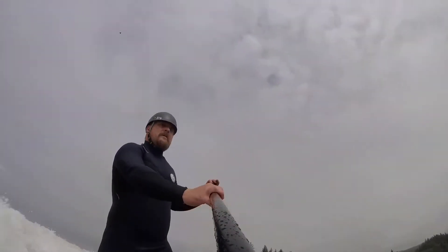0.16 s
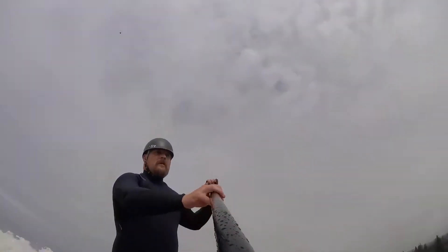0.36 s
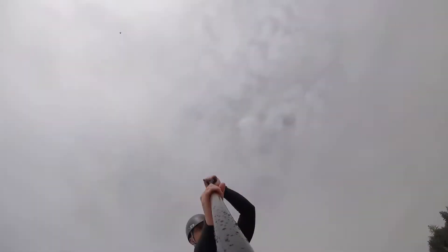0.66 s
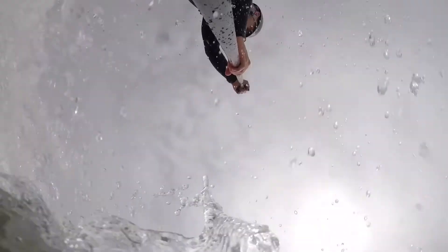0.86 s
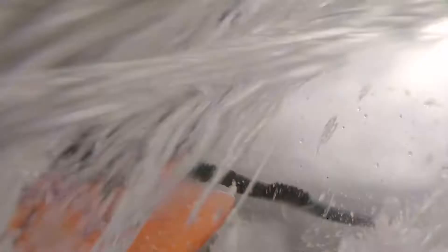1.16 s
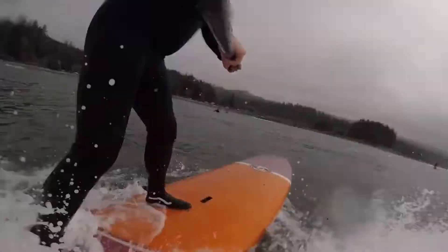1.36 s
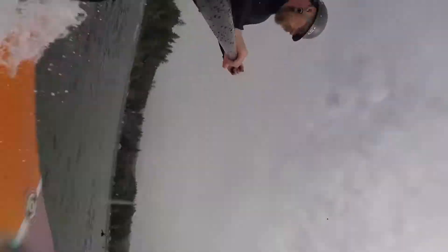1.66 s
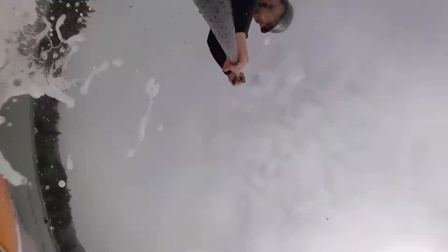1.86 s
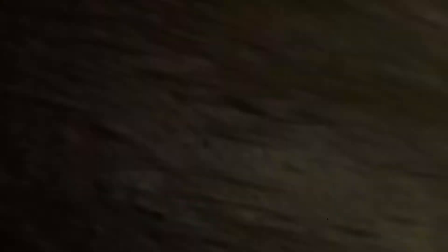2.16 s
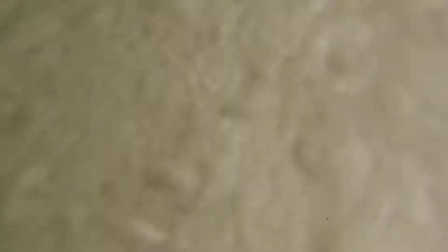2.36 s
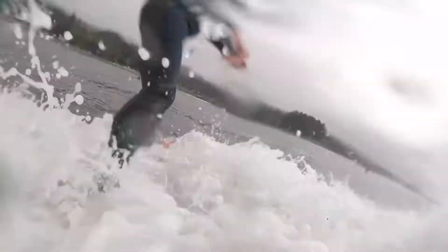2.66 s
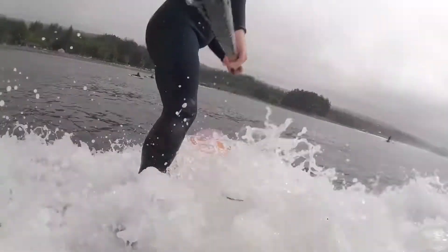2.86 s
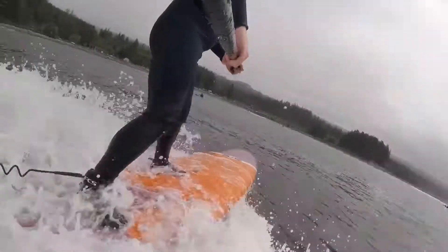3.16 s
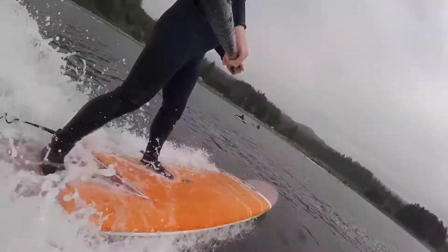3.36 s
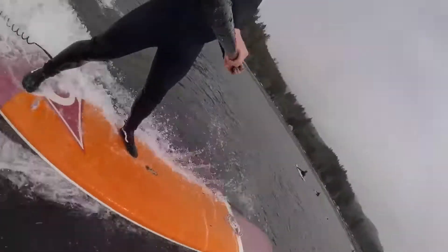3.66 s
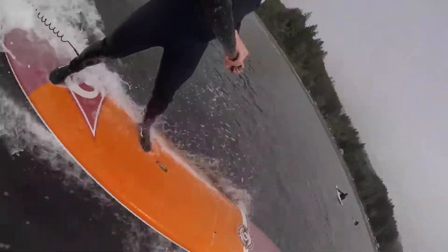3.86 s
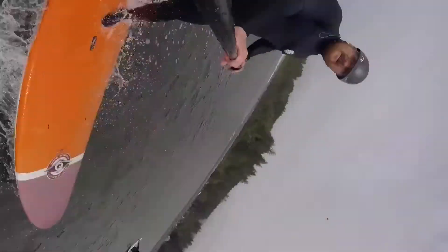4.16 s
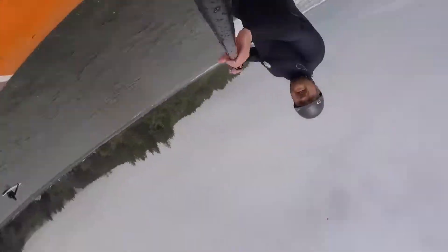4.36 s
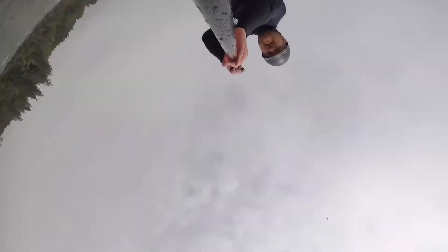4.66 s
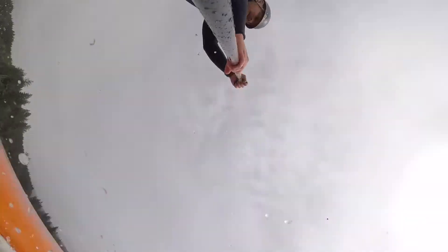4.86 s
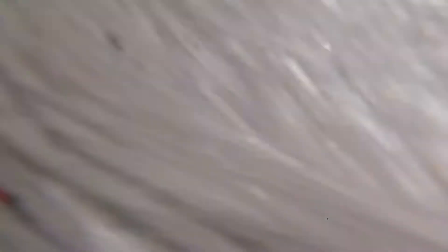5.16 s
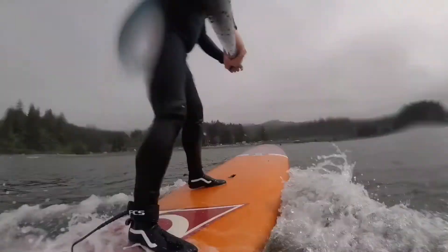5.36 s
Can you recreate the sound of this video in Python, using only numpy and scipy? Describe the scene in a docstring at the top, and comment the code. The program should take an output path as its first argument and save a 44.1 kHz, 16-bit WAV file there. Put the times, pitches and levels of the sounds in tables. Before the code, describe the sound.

Outdoors on a small breaking wave, a housed action-camera microphone is buffeted by air, hollow flutters and a thin airy whistle. It plunges under with sharp slaps and bubbly churning, emerges to near silence, gusts and plunges again, stays quiet, then hisses past a board in foam and strong wind before a last brighter, splashy dip and a quick fade.

```python
"""In breaking surf, a camera on a paddle swings through the wind, dips in three times and skims past a surfboard.
Filtered noise makes the air buffeting the microphone and the white water hissing around the board.
Wavering sine tones make fluttering vortices and one low thump; narrow noise of moving pitch whistles and chirps.
In each dip, short noise bursts slap the housing, and swarms of tiny rings churn and crackle as bubbles and spray.
Big bubbles glug as gliding sine tones, and thrown drops tick as small bursts."""
import sys
import numpy as np
from scipy import signal
from scipy.fft import rfft, irfft, next_fast_len
from scipy.io import wavfile
from scipy.ndimage import uniform_filter1d, minimum_filter1d, map_coordinates

SR = 44100
rng = np.random.default_rng(int(sys.argv[2]) if len(sys.argv) > 2 else 0)


def log_audio(samples):
    """Write samples as a 16-bit WAV file to the path given in sys.argv[1]."""
    # one column per channel
    frames = np.atleast_2d(samples).T
    # limit to full scale, then quantise
    limited = np.clip(frames, -1, 1)
    pcm = np.round(limited * 32767).astype(np.int16)
    wavfile.write(sys.argv[1], SR, pcm)


N = 243395  # length in samples

# In all tables, t60/s is the time a sound takes to fade by 60 dB.
# airflow on the microphone: (t/s, buffet level/dB, eddy level/dB)
WIND = [(0, -15, -22), (.15, -24.5, -22), (.42, -8, -18), (.6, -17, -18), (1.13, -20.5, -21),
        (1.46, -42.5, -55.5), (1.69, -43, -52), (2.05, -16.5, -23), (2.44, -19.5, -25.5),
        (2.63, -37.5, -50.5), (2.87, -52, -56), (3.09, -48.5, -51), (3.58, -23, -42.5), (4.0, -17.5, -26.5),
        (4.62, -19, -34), (5.08, -19.5, -26), (5.41, -40, -54.5), (5.52, -45, -60)]
# gusts, each a quick swell of the airflow: (centre t/s, length/s, buffet level/dB, eddy level/dB)
GUSTS = [(0.512, .08, -8, -24), (0.674, 0.089, -7.5, -15), (.807, 0.018, -6, -8.5),
         (1.783, 0.074, -19, -32.5), (1.93, .06, -10, -19.5), (2.068, 0.039, -3.5, -12),
         (3.538, 0.053, -13, -36.5), (3.705, 0.085, -11, -31.5), (3.773, 0.061, -19.5, -39),
         (3.983, 0.088, -9.5, -16), (4.056, 0.082, -6.5, -16), (4.739, 0.12, -9, -17.5),
         (4.839, 0.048, -9.5, -12), (4.933, 0.037, -11.5, -26), (5.056, 0.1, -18, -14.5)]
# air puffing into the microphone port: (t/s, peak level/dB, t60/s of its noisy tail)
PUFFS = [(.359, -18, 0.02), (.587, -15, 0.03), (0.674, -6, 0.024), (.707, -14.5, 0.027), (4.051, -6, 0.011),
         (4.229, -8.5, 0.089), (4.346, -21, 0.073), (4.41, -12.5, 0.067)]
# the breaking wave in open air: (t/s, roar level/dB, foam hiss level/dB, fine fizz level/dB)
SURF = [(0, -25.5, -30.5, -47.5), (.22, -24.5, -32, -51.5), (.37, -25, -33.5, -46), (.64, -29, -37, -49),
        (.8, -31, -36.5, -47), (1.36, -55, -61, -91.5), (1.48, -62.5, -64, -75), (1.68, -61, -61.5, -74),
        (1.8, -52.5, -54, -63), (2.76, -56.5, -62.5, -69.5), (3.02, -52.5, -58, -64.5),
        (3.29, -51, -47.5, -59), (3.75, -44, -36, -53), (3.98, -41.5, -37.5, -57), (4.2, -34, -36.5, -63),
        (4.62, -36, -44.5, -62.5), (5.28, -50.5, -58.5, -70.5), (5.39, -53.5, -51.5, -60)]
# water lying over the microphone port: (t/s, cover 0-1)
COVER = [(.9, 0.02), (.925, 0.8), (1.15, 0.16), (1.4, 0.37), (2.1, 0), (2.16, 0.7), (2.5, 1), (2.9, 0.11)]
# trains of shed vortices, and one low thump of the housing at 3.13 s: (t/s, length/s,
# start f/Hz before scatter, level/dB, overtone level/dB beside the base tone, pitch scatter 0-1)
FLUTTERS = [(0.038, 0.051, 159.4, -9.5, -14.5, 0.19), (0.08, 0.098, 204.7, -7, -17.5, 0),
            (.185, 0.065, 113.6, -9, -11.5, 0.17), (0.355, 0.018, 291, -10, -11, 0),
            (0.426, 0.065, 329.8, -9.5, -21.5, 0.08), (0.58, 0.034, 267, -17.5, 5, 0.02),
            (.675, 0.02, 330, -8.5, -34, 0.2), (3.128, 0.041, 140.4, -26, -19, 0.14),
            (3.885, 0.028, 173, -17, -13, 0.24), (3.974, 0.054, 159.2, -10.5, -10, 0.25),
            (4.054, 0.015, 267, -13.5, -16, .23), (4.229, 0.031, 211.3, -14.5, -13.5, 0.09),
            (4.236, 0.082, 161.5, -11, -24.5, 0.12), (4.352, 0.035, 109.5, -9.5, -18.5, 0.15),
            (4.411, 0.12, 313.2, -15, -18, 0.1), (4.419, 0.069, 185, -8, -13, 0.23),
            (4.489, 0.073, 142.7, -7.5, -17, 0.14)]
# air whistling past an edge: (t/s, f/Hz, level/dB)
WHISTLE = [(.24, 5500, -59), (.31, 5600, -44), (.45, 6050, -40), (.51, 6950, -37), (.59, 7200, -33.5),
           (.668, 8500, -37), (0.698, 7700, -62.5), (0.748, 8700, -39.5), (0.811, 7700, -35.5)]
# short chirps, two airy tones before the first dip, then squirts of water and air:
# (t/s, length/s, start f/Hz, end f/Hz, level/dB at mid-chirp)
CHIRPS = [(0.361, 0.012, 1165, 1122, -18), (0.429, .028, 792, 852, -19.5),
          (0.834, 0.014, 1126, 1000, -16.5), (0.854, 0.02, 7230, 6670, -30),
          (0.867, 0.059, 1523, 1002, -19.5), (1.103, 0.047, 1530, 1424, -23.5),
          (1.935, 0.0078, 1408, 1364, -25.5), (1.966, 0.02, 4700, 6100, -43),
          (1.984, 0.052, 2680, 2920, -40), (2.043, 0.037, 3880, 3240, -44.5),
          (2.088, 0.018, 2860, 3010, -33), (2.387, 0.037, 1702, 1480, -27), (4.718, 0.045, 2460, 2070, -25)]
# dips into the water: (from t/s, to t/s, typical bubble f/Hz, treble lift/dB)
DIPS = [(.79, 1.452, 1206, 3), (1.909, 2.66, 1452, 3), (4.682, 5.32, 1530, 10)]
# surges of water over the housing: (t/s, hold/s, churn t60/s, churn level/dB, spray level/dB)
SURGES = [(0.799, 0.037, 0.39, -21.5, -37), (0.863, .032, 0.099, -14.5, -32),
          (1.032, 0.021, 0.23, -23, -78), (1.07, 0.047, .3, -20.5, -59.5), (1.197, 0.05, 0.32, -36, -77),
          (1.924, 0.05, 0.14, -28, -44), (1.98, 0.16, .2, -29.5, -53.5), (2.098, 0.013, 0.079, -14, -34.5),
          (2.16, 0.094, .2, -30.5, -63), (2.234, 0.022, 0.33, -23.5, -58.5), (2.288, 0.1, 0.39, -27, -69.5),
          (4.703, 0.059, 0.42, -23.5, -56.5), (4.831, .003, 0.15, -19, -42.5),
          (4.863, 0.052, .15, -18.5, -52.5), (4.925, 0.019, 0.17, -12.5, -44),
          (5.005, 0.022, 0.17, -16, -53), (5.058, 0.023, 0.28, -25, -56), (5.149, .015, 0.25, -29.5, -61)]
# water slapping the housing: (t/s, smack peak level/dB, crack and push levels/dB beside the smack)
SLAPS = [(0.8, -3, -12, -4.5), (.837, -7, -14, -1), (.867, 0, 0, -0.5), (.887, -12.5, -20.5, 3),
         (.9, -7, -27.5, 4), (0.912, -5.5, -49.5, -3.5), (1.011, -13, -44, 7.5), (1.035, -1, -17.5, -13),
         (1.107, -2.5, -38.5, -25), (1.246, -29, -50, -10.5), (1.921, -14.5, -17.5, 3),
         (1.936, -9, -29.5, 2.5), (2.104, 0, -34, -16), (2.119, -0.5, -38, -2), (2.239, -10, -39, -1.5),
         (2.443, -26, -30, 8.5), (2.487, -17.5, -31, -20), (2.542, -29.5, -37, 13),
         (2.687, -25.5, -22.5, 16), (2.719, -35.5, -41, 17.5), (4.707, -28, -24, 22.5),
         (4.827, -1, -31.5, -9), (4.901, -12, -35, 8.5), (4.934, -6, -28.5, 3), (4.948, -1, -20.5, -10),
         (5.028, 2.5, -46, 5.5), (5.073, -6, -39, 7.5), (5.188, -20.5, -18.5, 10.5),
         (5.243, -28.5, -47, 11.5)]
# large bubbles glugging as the water drains: (t/s, base f/Hz, level/dB before fading)
GLUGS = [(.94, 414, -10), (1.02, 360, -6.5), (1.149, 380, -18), (1.24, 388, -22.5), (1.329, 360, -41),
         (2.14, 455, -18), (2.59, 383, -25.5)]
# single drops landing on the housing: (t/s, tap peak level/dB, tick level/dB beside the tap)
DROPS = [(3.1266, -41.5, 3.5), (3.243, -43.5, 3.5), (3.9828, -18.5, -23.5), (4.0203, -21, -39),
         (4.2458, -14.5, -38.5), (4.3022, -19, -27), (4.5509, -31.5, -2), (4.6218, -22, -30),
         (5.1975, -26.5, -39)]

# Colours, meaning how strong each pitch region is: (f/Hz, level/dB per Hz)
# slow, deep thumps of wind
BUFFET = [(8, -5.5), (25, 3), (55, 2.5), (100, 1), (150, -13.5), (250, -43), (600, -58.5), (1500, -120)]
# smaller, quicker swirls of wind
EDDIES = [(70, -19.5), (150, 4), (220, -1), (350, -6), (500, -16), (800, -23), (1600, -41.5), (4000, -99.5)]
# low body of the breaking wave
ROAR = [(200, -20.5), (450, -2), (700, -4), (1200, -7.5), (1700, -7.5), (2400, -17), (3500, -35.5),
        (6000, -68.5)]
# hiss of the foam, and the tap of a drop
FOAM = [(900, -36.5), (1700, -5.5), (2150, 2.5), (2700, -5), (3200, -9.5), (3800, -21.5), (4500, -43),
        (7000, -68), (12000, -84.5)]
# finest bubbles in the foam, and the tick of a drop
FIZZ = [(3000, 0), (4500, -6), (5500, -5.5), (6700, 0), (8000, -7.5), (9500, -14.5), (11500, -18.5),
        (15000, -31)]
# bubbly water over the housing, and the smack of a slap
CHURN = [(150, -18.5), (350, 6.5), (700, -1), (1000, -4.5), (1600, 0), (2200, -8), (3000, -14),
         (3900, -26.5), (6000, -62), (12000, -90)]
# bright spray, and the crack of a slap
SPRAY = [(2000, -24.5), (3500, -4.5), (5000, -6.5), (7000, 0.5), (9000, -4.5), (11000, -13), (15000, -33)]
# low push of pressure in a slap
PUSH = [(15, -26), (50, 2.5), (110, 4), (250, -7), (500, -23.5), (1200, -24), (4000, -99.5)]
# skirt of an edge tone: (distance from its pitch f/Hz, level/dB)
TONE_SKIRT = [(50, 11), (200, 0.5), (450, 1), (900, -17), (2000, -31), (5000, -78.5)]
# hollow puff in the microphone port
PUFF = [(80, -19.0), (300, -11.5), (600, 11.0), (850, 1.0), (1200, -15.5), (2500, -62.5)]
# hiss of a whistle that has broken up
WHISTLE_HISS = [(3000, -46.5), (4500, -11.5), (5600, 7), (7000, 5.5), (9000, -6.5), (10500, -22.0), (14000, -32)]
# overtones 2 to 5 of vortices and thump, beside one another: (level/dB)
FLUTTER_OVERTONES_DB = [8, 0.0, -8, -31.5]

LOCKED_BUFFET_DB, LOCKED_EDDY_DB = -3.5, -2.5  # turbulence eases during each vortex train and the thump
FLUTTER_SAG = .11  # share by which the pitch falls along a vortex train or the thump
FLUTTER_ATTACK_S, FLUTTER_RELEASE_S = .0075, .024
BREAKUP_HZ, BREAKUP_SPAN_HZ = 6740, 1900  # above this pitch the tone turns to hiss, fully so one span higher
BROKEN_AT_REST = .08  # share of hiss in the slowest whistle
OCTAVE_DB = -21  # overtone of the slowest whistle; it is gone at the breakup pitch
SURGE_ATTACK_S = .008
SPRAY_LIFE = 0.49  # spray dies in this share of the churn's time
SPLATTER_T60_S, GLUG_T60_S = .022, 0.081
TOP_HZ = 15800  # nothing is kept from here up


def amp(db):
    """Turn decibels into a gain."""
    return 10 ** (np.asarray(db) / 20)


def unit(x):
    """Scale x to an average (rms) strength of 1."""
    return x / np.sqrt(np.mean(x ** 2) + 1e-20)


def curves(rows):
    """Join a table's points by straight lines: one curve for each column after the time."""
    s, *cols = np.transpose(rows)
    return [np.interp(np.arange(N) / SR, s, c) for c in cols]


def wobble(rate):
    """Draw a smooth random curve through this many random points a second."""
    knots = rng.standard_normal(int(N * rate / SR) + 4)
    return map_coordinates(knots, [np.arange(N) * rate / SR])


def during(start, end):
    """Give 1 between two times and 0 outside, with soft edges."""
    t = np.arange(N) / SR
    return uniform_filter1d(1. * ((t > start) & (t < end)), size=400)


def swell(centre, length):
    """Rise and fall in a smooth arch of height 1."""
    return np.cos(np.pi * np.clip((np.arange(N) / SR - centre) / length, -.5, .5))


def surge(start, hold, t60):
    """Rise fast, hold, then die away ever more gently, as a surge of water does."""
    t = np.arange(N) / SR - start
    attack = np.clip(t / SURGE_ATTACK_S + 1, 0, 1)
    return attack * amp(-60 * np.clip((t - hold) / t60, 0, 2))


def coloured(x, points):
    """Filter x to a colour; the filter has energy 1 and never sounds ahead of its input."""
    size = 8192
    hz, db = np.transpose(points)
    gain = amp(np.interp(np.log(np.fft.rfftfreq(size, 1 / SR) + 1), np.log(hz), db))
    # folding the cepstrum puts the filter's energy as early as it can be
    cepstrum = irfft(np.log(gain))
    cepstrum[1:size // 2] *= 2
    cepstrum[size // 2 + 1:] = 0
    response = irfft(np.exp(rfft(cepstrum)))[:size // 2]
    return signal.fftconvolve(x, response / np.linalg.norm(response))[:len(x)]


def rush(points, patchy_db):
    """Make coloured noise of rms 1 whose strength drifts in patches of time and pitch."""
    z = signal.stft(rng.standard_normal(N), nperseg=512)[2]
    field = uniform_filter1d(rng.standard_normal(z.shape), size=5, axis=0)  # blurred over pitch
    field = uniform_filter1d(field, size=8, axis=1)  # blurred over time
    patchy = signal.istft(z * amp(patchy_db * unit(field)), nperseg=512)[1][:N]
    return unit(coloured(patchy, points))


def bubbles(rate, centre_hz, spread, cycles, size_db):
    """Scatter a swarm of short damped rings, rms 1 in all; each rises in pitch as it dies."""
    count = int(rate * N / SR)
    t = np.arange(560) / SR
    hz = np.clip(centre_hz * np.exp(spread * rng.standard_normal((count, 1))), None, SR / 3)
    size = amp(size_db * np.minimum(rng.exponential(size=(count, 1)), 4))
    age = hz * t / cycles
    rings = size * np.exp(-2 * age) * np.sin(2 * np.pi * hz * t * (1 + 0.07 * np.minimum(age, 2)))
    at = rng.integers(N, size=(count, 1)) + np.arange(len(t))
    return unit(np.bincount(at.ravel(), rings.ravel())[:N])


def burst(points, t60, grit):
    """Make a sharp impact trailed by dying noisy splatter, with a peak of 1."""
    t = np.arange(SR // 10) / SR
    force = grit * rng.standard_normal(len(t)) * amp(-60 * t / t60)
    force[0] += 1
    x = coloured(force, points)
    return x / np.abs(x).max()


def edge_tone(hz):
    """Make narrow noise of rms 1 that follows a moving pitch."""
    phase = 2 * np.pi * np.cumsum(hz) / SR
    a, b = (coloured(rng.standard_normal(len(hz)), TONE_SKIRT) for _ in range(2))
    return unit(a * np.cos(phase) + b * np.sin(phase))


def add(track, s, x):
    """Mix x into the track from time s."""
    part = track[max(round(s * SR), 0):][:len(x)]
    part += x[:len(part)]


def wind():
    """Large eddies thump the microphone, small ones tear at it in lumps, gusts swell both and puffs enter its port."""
    buffet_gain, eddy_gain = amp(curves(WIND))
    for s, length, buffet_db, eddy_db in GUSTS:
        gust = swell(s, length)
        buffet_gain = np.maximum(buffet_gain, amp(buffet_db) * gust)
        eddy_gain = np.maximum(eddy_gain, amp(eddy_db) * gust)

    buffet = rush(BUFFET, patchy_db=-2.0)
    # even out the noise's own slow swells before adding a chosen wobble
    buffet = buffet / np.sqrt(np.abs(uniform_filter1d(buffet ** 2, size=3000)))
    buffet = buffet * amp(2.6 * wobble(25))
    eddies = unit(rush(EDDIES, patchy_db=1.5) * amp(1.74 * wobble(55)))

    locked = np.minimum(sum(during(s, s + length) for s, length, *_ in FLUTTERS), 1)
    out = buffet_gain * amp(LOCKED_BUFFET_DB * locked) * buffet
    out += eddy_gain * amp(LOCKED_EDDY_DB * locked) * eddies
    for s, db, t60 in PUFFS:
        add(out, s, amp(db) * burst(PUFF, t60, grit=0.38))
    return out


def surf():
    """The broken wave roars; its foam hisses and fizzes with tiny bursting bubbles."""
    roar_db, foam_db, fizz_db = curves(SURF)
    roar = unit(rush(ROAR, patchy_db=2.5) * amp(0.27 * wobble(58)))
    popping = bubbles(rate=2200, centre_hz=2870, spread=.3, cycles=0.99, size_db=5.5)
    popping = unit(coloured(popping, FOAM))
    foam = unit(rush(FOAM, patchy_db=2.5) + amp(-3.5) * popping)
    fizz = rush(FIZZ, patchy_db=.8)
    cover, = curves(COVER)  # water over the port muffles the foam hiss most, the roar least
    return (amp(roar_db - 5 * cover) * roar
            + amp(foam_db - 19 * cover) * foam
            + amp(fizz_db - 13 * cover) * fizz)


def vortices_and_thump():
    """Vortices peel off the housing in brief unsteady trains, a hollow flutter; once the housing gives a low thump."""
    out = np.zeros(N)
    for s, length, start_hz, db, overtone_db, scatter in FLUTTERS:
        t = np.arange(int((length + FLUTTER_RELEASE_S / 2) * SR)) / SR
        sagging_hz = start_hz * (1 - FLUTTER_SAG * t / length)
        hz = sagging_hz * np.exp(scatter * wobble(178.4)[:len(t)])
        phase = 2 * np.pi * np.cumsum(hz) / SR
        overtones = sum(amp(level + 1.8 * wobble(39)[:len(t)]) * np.sin(k * phase + 2 * np.pi * rng.random())
                        for k, level in enumerate(FLUTTER_OVERTONES_DB, 2))
        tone = unit(np.sin(phase) + amp(overtone_db) * unit(overtones))
        fade_in = np.clip(t / FLUTTER_ATTACK_S, 0, 1)
        fade_out = np.clip((length - t) / FLUTTER_RELEASE_S + .5, 0, 1)
        add(out, s, amp(db) * fade_in * fade_out * tone)
    return out


def whistle():
    """An airy edge tone climbs as the paddle speeds up, loses its overtone, breaks into hiss and wavers at the end."""
    hz, db = curves(WHISTLE)
    broken = np.clip((hz - BREAKUP_HZ) / BREAKUP_SPAN_HZ, BROKEN_AT_REST, 1)
    hiss = rush(WHISTLE_HISS, patchy_db=-2.6)
    slow = np.clip((BREAKUP_HZ - hz) / (BREAKUP_HZ - WHISTLE[0][1]), 0, 1)
    tone = edge_tone(hz) + amp(OCTAVE_DB) * slow * edge_tone(2 * hz)
    # square roots share out power, not height
    mix = np.sqrt(1 - broken) * tone + np.sqrt(broken) * hiss
    return during(WHISTLE[0][0], WHISTLE[-1][0]) * amp(db) * mix


def chirps():
    """Short gliding chirps: two airy tones before the first dip, then squirts of water and air."""
    out = np.zeros(N)
    for s, length, start_hz, end_hz, db in CHIRPS:
        u = np.linspace(0, 1, int(length * SR))  # progress through the chirp
        chirp = edge_tone(start_hz + (end_hz - start_hz) * u)
        add(out, s, amp(db) * np.sin(np.pi * u) * chirp)
    return out


def wash():
    """Water closes over the housing in surges: clumps of bubbles churn and spray crackles."""
    out = np.zeros(N)
    clumps = wobble(70)
    crackle = bubbles(rate=670, centre_hz=6500, spread=0.44, cycles=1.3, size_db=5.5)
    beads = bubbles(rate=700, centre_hz=5000, spread=0.4, cycles=18, size_db=-4.5)  # tiny bubbles ring longer
    spray = crackle + amp(-8.5) * beads + amp(-5) * rng.standard_normal(N)
    spray = unit(coloured(spray, SPRAY) * amp(1.7 * clumps))
    # the strongest surge at each moment sets the level
    churn_gain = np.max([amp(db) * surge(s, hold, t60) for s, hold, t60, db, _ in SURGES], axis=0)
    spray_gain = np.max([amp(db) * surge(s, hold, SPRAY_LIFE * t60) for s, hold, t60, _, db in SURGES], axis=0)
    for start, end, bubble_hz, bright_db in DIPS:
        swarm = bubbles(rate=1400, centre_hz=bubble_hz, spread=.45, cycles=6, size_db=3.8)
        water = swarm + .5 * rng.standard_normal(N)
        # the treble lift grows from none at 1500 Hz to full at 2600 Hz
        colour = [(hz, db + bright_db * np.interp(hz, [1500, 2600], [0, 1])) for hz, db in CHURN]
        churn = unit(coloured(water, colour) * amp(2.56 * clumps))
        out += during(start, end) * (churn_gain * churn + spray_gain * spray)
    return out


def slaps():
    """Water hits the housing with a dull smack, a bright crack and a low push of pressure."""
    out = np.zeros(N)
    for s, db, crack_db, push_db in SLAPS:
        smack = burst(CHURN, SPLATTER_T60_S, grit=0.039)
        crack = burst(SPRAY, t60=0.0052, grit=0.75)
        push = burst(PUSH, t60=0.0088, grit=0.0028)
        add(out, s, amp(db) * (smack + amp(crack_db) * crack - amp(push_db) * push))
    return out


def glugs():
    """Big bubbles ring briefly, their wavering pitch creeping up."""
    out, t = np.zeros(N), np.arange(SR // 5) / SR
    for s, hz, db in GLUGS:
        rising_hz = hz * (1 + 0.91 * t + 0.032 * wobble(120)[:len(t)])
        phase = 2 * np.pi * np.cumsum(rising_hz) / SR
        soft_start = 1 - np.exp(-t / 0.0075)
        add(out, s, amp(db - 60 * t / GLUG_T60_S) * soft_start * np.sin(phase))
    return out


def drops():
    """Thrown drops land on the housing with a tap and a brighter tick."""
    out = np.zeros(N)
    for s, db, tick_db in DROPS:
        tap = burst(FOAM, t60=0.012, grit=0.67)
        tick = burst(FIZZ, t60=0.022, grit=0.5)
        add(out, s, amp(db) * (tap + amp(tick_db) * tick))
    return out


def scene():
    """Add up air and water at the one microphone."""
    air = wind() + vortices_and_thump() + whistle()
    water = surf() + wash() + slaps() + glugs() + drops()
    return (air + water + chirps())[None]


def record(dry):
    """The camera rounds off the highest peaks and keeps nothing above its band limit."""
    ceiling = .95
    needed = ceiling / np.maximum(np.abs(dry), ceiling)  # gain that holds each sample at the ceiling
    gain = uniform_filter1d(minimum_filter1d(needed, size=200), size=200)
    limited = dry * gain
    m = next_fast_len(N + SR // 2)
    kept = np.fft.rfftfreq(m, 1 / SR) < TOP_HZ
    return irfft(rfft(limited, m) * kept, m)[..., :N]


dry = scene()
out = record(dry)
log_audio(out)
```